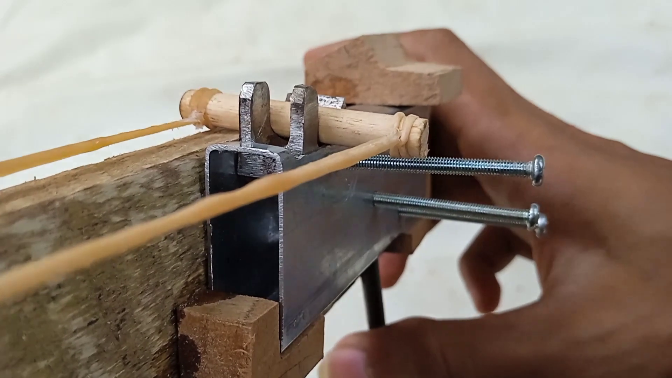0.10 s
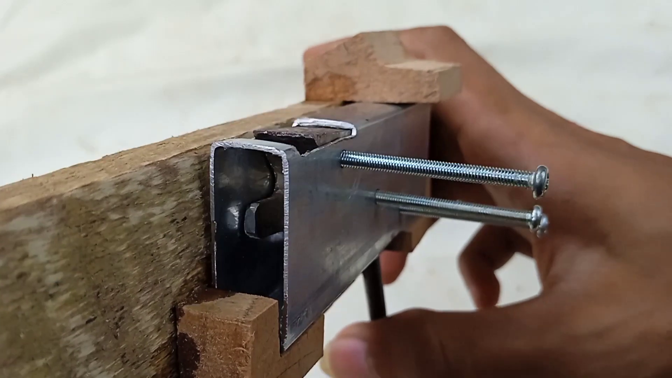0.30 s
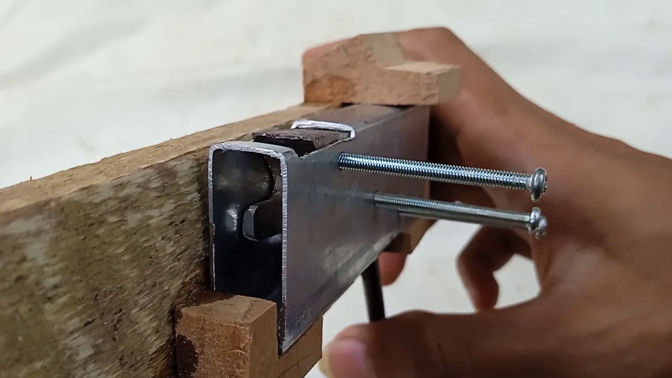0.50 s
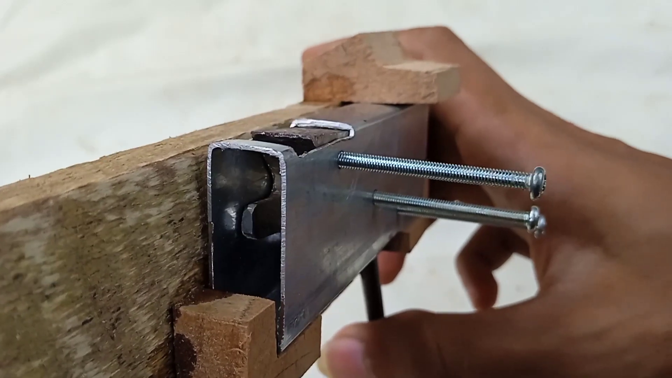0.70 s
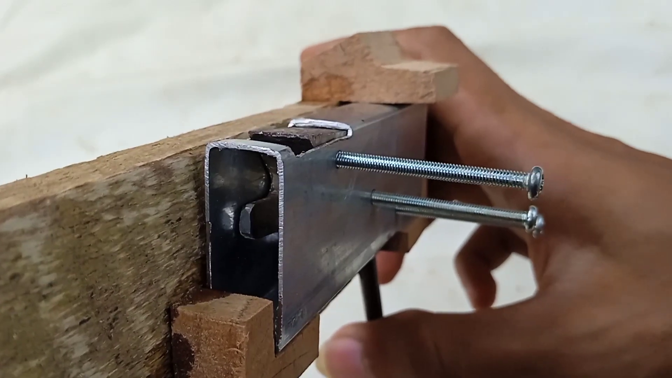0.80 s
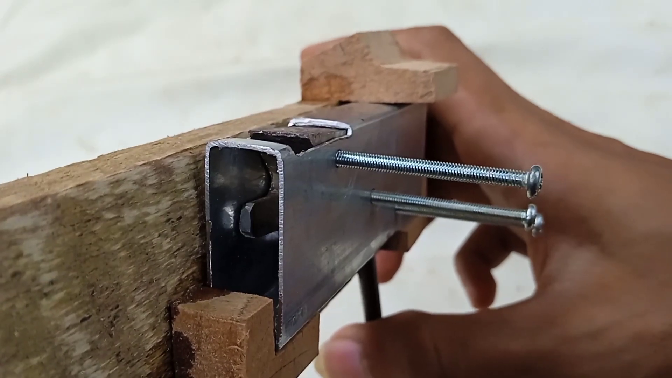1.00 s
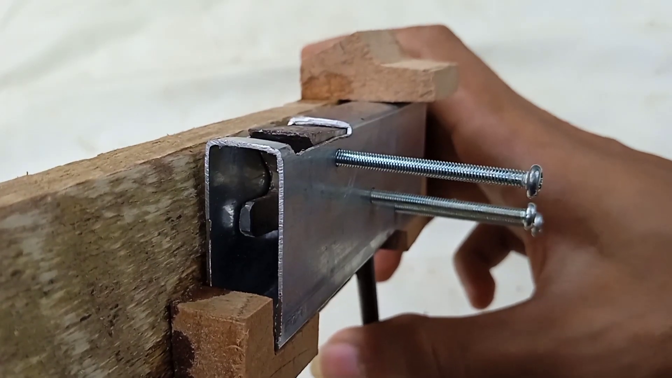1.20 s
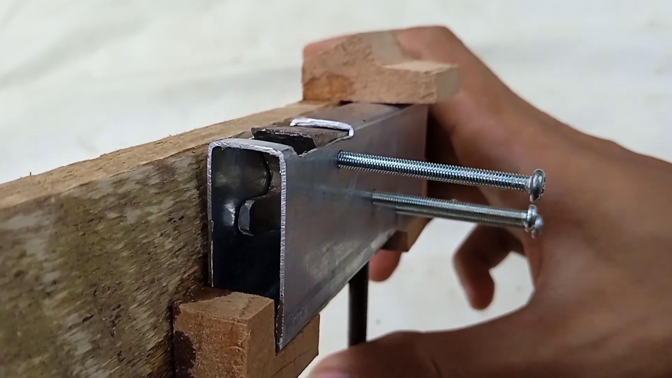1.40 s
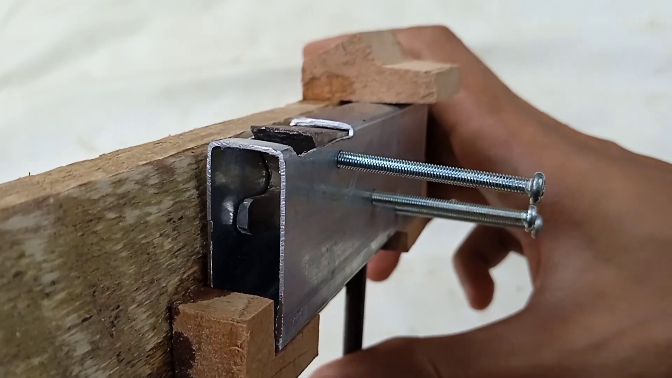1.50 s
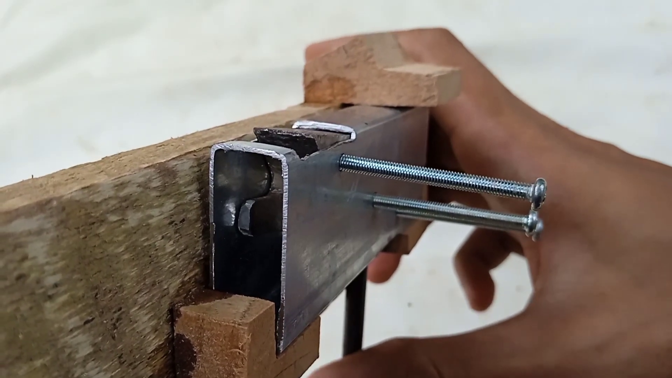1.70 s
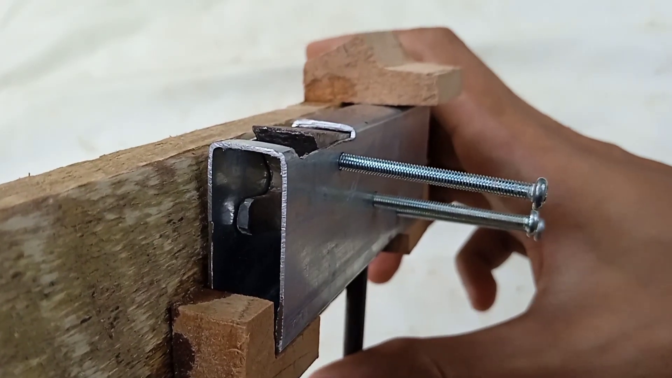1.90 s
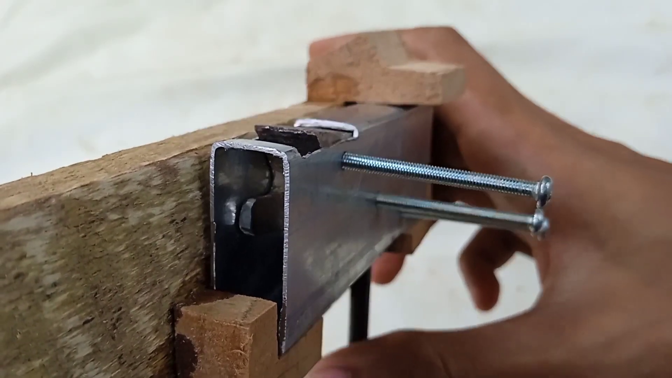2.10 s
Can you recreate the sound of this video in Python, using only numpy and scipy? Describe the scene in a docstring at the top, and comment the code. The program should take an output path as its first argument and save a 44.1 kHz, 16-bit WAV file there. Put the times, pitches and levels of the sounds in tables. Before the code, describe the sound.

A steel catch clatters in its metal tube and a rubber band slaps the wooden stock almost at once, a hard bright snap. Much quieter ticks follow, close-miked in a small room over faint background noise.

```python
"""A faint low rumble, hiss and thin, high whine lead to a rubber-band crossbow fired close by in a small room.
The steel catch flips and rattles in its metal tube, and the freed band slaps the wooden stock and rebounds.
Afterwards a finger works the loose trigger, with faint clicks and scrapes.
Blows are decaying modes plus contact noise with a diffuse room tail; the background is filtered noise."""
import sys
import numpy as np
from scipy import signal
from scipy.fft import rfft, irfft
from scipy.io import wavfile

SR = 44100
rng = np.random.default_rng(int(sys.argv[2]) if len(sys.argv) > 2 else 0)


def store_wav(level_fs):
    """Save 16-bit WAV to argv[1]."""
    pcm = np.round(np.clip(np.atleast_2d(level_fs), -1, 1) * 32767)
    wavfile.write(sys.argv[1], SR, pcm.T.astype(np.int16))


N = 97020

# modes of the steel catch and tube: (frequency [Hz], relative level [dB], t60 [s])
STEEL_MODES = [(1825, -17, 0.024), (2192, -1, 0.024), (2416, -5, 0.014), (2470, -9.5, 0.032),
               (2586, -14.5, 0.037), (2720, -16, 0.063), (2822, -18.5, .07), (3180, -17.5, 0.038),
               (4207, -16, 0.026), (5770, -18.5, .035), (6740, -20, 0.032), (15167, -21, .016)]


def amp(db):
    """Level law: decibels to an amplitude ratio."""
    return 10 ** (np.asarray(db) / 20)


def unit(x):
    """Power normalisation: scale to rms 1."""
    return x / np.sqrt(np.mean(x ** 2) + 1e-20)


def along(points, hz):
    """Logarithmic pitch: interpolate (frequency, value) points on a log-frequency axis."""
    f, v = np.transpose(points)
    return np.interp(np.log(hz + 1), np.log(f + 1), v)


def curve(rows):
    """Linear interpolation: (time, value) rows as one value per sample."""
    return np.interp(np.arange(N) / SR, *np.transpose(rows))


def noise(gain, size):
    """Spectral shaping: white noise weighted by gain over frequency, at rms 1."""
    spectrum = rfft(rng.standard_normal(size))
    hz = np.fft.rfftfreq(size, 1 / SR)
    return unit(irfft(spectrum * gain(hz), size))


def fade(t, t60):
    """Exponential damping: the level falls by 60 dB in t60 seconds."""
    return np.exp(-np.log(1000) * t / t60)


def onset(t, rise_s):
    """Exponential build-up with time constant rise_s."""
    return 1 - np.exp(-t / rise_s)


def add(out, s, x):
    """Superposition: mix x into out from time s, cut at the end of out."""
    part = out[round(s * SR):][:len(x)]
    part += x[:len(part)]


def ring(modes):
    """Modal vibration: damped sinusoids whose levels differ a little at each blow."""
    scatter_db = 1  # standard deviation
    t = np.arange(SR // 8) / SR
    tones = np.zeros(len(t))
    for hz, db, t60 in modes:
        level = amp(db + scatter_db * rng.standard_normal())
        tones += level * fade(t, t60) * np.sin(2 * np.pi * hz * t)
    return tones * onset(t, rise_s=0.0005)


def crack(spectrum, t60, colour=np.zeros_like):
    """Broadband contact excitation: dense, quickly dying noise with an optional extra colour in dB."""
    t = np.arange(SR // 8) / SR
    burst = noise(lambda hz: amp(along(spectrum, hz) + colour(hz)), size=len(t))
    return burst * fade(t, t60) * onset(t, rise_s=0.0005)


def catch():
    """Impact excitation of modes: the released catch whirls round and clatters against the tube."""
    # the catch strikes its housing: (time [s], ring level [dB], crack level [dB])
    strikes = [(0.2033, -30, -39), (0.2064, -25, -25.5), (0.2090, -15.5, -20), (0.213, -13, -25),
               (0.2166, -28, -35), (0.2206, -31.5, -29.5), (0.2568, -35.5, -52.5), (0.2668, -43.5, -47.5),
               (0.2895, -54, -60)]
    # steel contact noise: (frequency [Hz], relative spectral level [dB])
    steel_crack = [(100, -38.5), (400, -16), (950, -9.5), (1300, -12), (2300, 3), (3100, -6), (6300, 1.5),
                   (7500, -10.5), (10000, -10.5), (12000, -21), (13800, -18.5), (15300, -2.5)]
    out = np.zeros(N)
    for s, ring_db, crack_db in strikes:
        metal = amp(ring_db) * ring(STEEL_MODES)
        contact = amp(crack_db) * crack(steel_crack, t60=0.027)
        add(out, s, in_room(metal + contact))
    return out


def band():
    """Impact on damped wood: the rubber band slaps the stock and rebounds."""
    # the band meets the stock: (time [s], knock level [dB], crack level [dB])
    slaps = [(0.2226, -19, -15.5), (0.2259, -14, -22.5), (0.228, -31, -33), (0.256, -48, -48.5),
             (0.2650, -46.5, -45)]
    # modes of the wooden stock: (frequency [Hz], relative level [dB], t60 [s])
    stock_modes = [(490, -22, 0.033), (896, -14.5, .03), (1230, -19.5, 0.03), (1590, -2.5, 0.01),
                   (1746, -3, 0.021), (2023, -0.5, 0.015), (2200, -2, 0.028), (2640, -8, 0.021),
                   (3450, -11, .018), (4172, -11, .02), (4264, -7.5, 0.018)]
    # slap contact noise: (frequency [Hz], relative spectral level [dB])
    slap_crack = [(100, -34), (350, -17), (900, -5.5), (1200, 1.5), (2000, 9), (3100, 0.5), (4300, 2.5),
                  (5000, -6), (7000, -4), (10000, -8), (13300, -20.5), (15300, -11)]
    out = np.zeros(N)
    for s, knock_db, crack_db in slaps:
        knock = amp(knock_db) * ring(stock_modes)
        contact = amp(crack_db) * crack(slap_crack, t60=0.021)
        add(out, s, in_room(knock + contact))
    return out


def trigger():
    """Light impact and friction: ticks of the steel parts, coloured by contact, with gritty rubbing."""
    # the loose trigger ticks:
    # (time [s], ring level [dB], crack level [dB], brightest frequency [Hz], fall above it [dB per octave])
    ticks = [(0.3931, -62, -59.5, 2300, 3), (0.4035, -57, -59, 2780, 10), (0.764, -80, -60.5, 500, 5.5),
             (1.02, -54, -56.5, 2580, 31), (1.126, -75, -67.5, 2770, 13), (1.379, -69, -64, 2500, 3),
             (1.3922, -59, -55.5, 3830, 8.5), (1.4445, -64, -63, 2480, 12), (1.476, -67, -56.5, 1900, 1),
             (1.4785, -47.5, -57.5, 2120, 6.5), (1.4991, -62, -56, 1700, 4), (1.509, -65, -71, 1980, 4.5),
             (1.549, -69, -66.5, 2214, 20), (1.581, -62, -64, 2290, 13), (1.5928, -60.5, -60, 2880, 11),
             (1.597, -61, -58.5, 990, 4), (1.6256, -62.5, -57, 2830, 11.5), (2.181, -68, -65.5, 2150, 3.5),
             (2.193, -64, -73, 3000, 2)]
    # tick contact noise before its colour: (frequency [Hz], relative spectral level [dB])
    tick_crack = [(100, -37), (500, 5.5), (1200, -6.5), (2400, 0.5), (3400, -4), (4500, -5.5), (6700, -3.5),
                  (8000, -12.5), (13000, -18), (15300, -8.5)]
    # the trigger rubs: (time [s], length [s], level [dB])
    scrapes = [(1.373, 0.029, -73.5), (1.421, 0.052, -75), (1.465, 0.042, -68), (1.537, 0.031, -80.5),
               (1.576, .03, -71), (2.159, 0.062, -80.5)]
    # rubbing noise: (frequency [Hz], relative spectral level [dB])
    rub_spectrum = [(200, -12), (1200, -1.5), (2300, 3), (3300, -0.5), (4500, -17), (7000, -24),
                    (12000, -27), (15300, -18)]
    bass_fall_share = 0.44  # below its brightest frequency a tick falls off less steeply
    out = np.zeros(N)
    for s, ring_db, crack_db, bright_hz, fall_db in ticks:
        def colour(hz):
            """Contact filter: gain in dB falling to either side of the brightest frequency."""
            octaves = np.log2((hz + 1) / bright_hz)
            return fall_db * np.minimum(bass_fall_share * octaves, -octaves)

        modes = [(hz, db + colour(hz), t60) for hz, db, t60 in STEEL_MODES]
        add(out, s, amp(ring_db) * ring(modes))
        add(out, s, amp(crack_db) * crack(tick_crack, 0.019, colour))
    for s, length, db in scrapes:
        size = int(length * SR)
        # grit: a random level, spread 4 dB, held for 64 samples at a time
        grit = np.repeat(amp(4 * rng.standard_normal(N // 64)), 64)[:size]
        rub = noise(lambda hz: amp(along(rub_spectrum, hz)), size=N)[:size]
        add(out, s, amp(db) * unit(grit * rub) * signal.windows.tukey(size, .5))
    return in_room(out)[:N]


def in_room(x):
    """Diffuse reverberation: a close sound followed by a short tail with decay set by frequency."""
    # reverberation: (frequency [Hz], t60 [s])
    room_decay = [(200, .25), (800, .22), (1700, .29), (5000, 0.26), (9000, .285), (12500, 0.16),
                  (15200, 0.25)]
    # colour of the tail: (frequency [Hz], relative level [dB])
    room_colour = [(200, 4.5), (500, 6.5), (850, 3.5), (1150, -3), (2200, -3.5), (4500, -1.5), (9000, 2),
                   (12500, 3.5), (15200, 1), (16300, -7)]
    tail_db, build_s = -18, 0.0076  # tail energy against the direct sound; build-up time constant
    hz, t, z = signal.stft(rng.standard_normal(SR // 2), SR, nperseg=256)
    decay = fade(t, along(room_decay, hz)[:, None])
    shape = decay * amp(along(room_colour, hz))[:, None] * onset(t, build_s)
    tail = signal.istft(z * shape, SR, nperseg=256)[1]
    answer = amp(tail_db) * tail / np.linalg.norm(tail)
    answer[0] += 1  # direct sound
    return signal.fftconvolve(x, answer)


def hiss_swells():
    """Band-limited noise under an envelope: high hiss comes up quickly and ebbs away."""
    # swells of the high hiss: (time [s], noise level before the envelope [dB])
    swells = [(0.0, -92), (0.429, -89), (0.841, -90.5), (1.68, -91.5), (2.071, -90.5)]
    centre_hz, half_width_hz = 7700, 1000
    out, t = np.zeros(N), np.arange(SR // 2) / SR
    envelope = fade(t, t60=0.89) * onset(t, rise_s=0.0086)
    for s, db in swells:
        hiss = noise(lambda hz: 1 / (1 + np.abs((hz - centre_hz) / half_width_hz) ** 10), size=len(t))
        add(out, s, amp(db) * hiss * envelope)
    return out


def background():
    """Filtered random noise: a slowly varying rumble, steady hiss and a narrow, fluttering whine."""
    # rumble and hiss together: (frequency [Hz], relative spectral level [dB])
    floor_spectrum = [(20, -35.5), (40, -24), (60, -12.5), (115, -1), (170, -5), (260, -13.5), (500, -23),
                      (1000, -29), (2000, -34.5), (4500, -42), (8200, -45), (9300, -49.5), (14000, -50),
                      (15300, -43.5)]
    # gain of the rumble: (time [s], level [dB])
    rumble_levels = [(0, -62.5), (.38, -63), (.5, -72), (.55, -73), (.585, -56), (.62, -66.5), (.85, -66),
                     (1.3, -73), (1.39, -68.5), (1.5, -75.5), (1.65, -68.5), (1.75, -73.5), (1.93, -74),
                     (2.1, -63), (2.2, -72)]
    # whine: (time [s], level [dB])
    whine_levels = [(0, -80.5), (.35, -81.5), (.6, -78.5), (.95, -77.5), (1.25, -83.5), (1.5, -80.5),
                    (2.2, -86.5)]
    hiss_db, hiss_from_hz = -68, 180  # the floor above this edge stays steady
    whine_hz, whine_half_width_hz = 5398.5, 68
    floor = noise(lambda hz: amp(along(floor_spectrum, hz)), size=N)
    low_pass = 1 / (1 + (np.fft.rfftfreq(N, 1 / SR) / hiss_from_hz) ** 4)
    low = irfft(rfft(floor) * low_pass, N)
    rumble = amp(curve(rumble_levels)) * low
    hiss = amp(hiss_db) * (floor - low)
    whine = noise(lambda hz: 1 / (1 + np.abs((hz - whine_hz) / whine_half_width_hz) ** 3), size=N)
    return rumble + hiss + amp(curve(whine_levels)) * whine


def scene():
    """Radiation and superposition: the crossbow, thinned in the bass, over its background."""
    # small parts radiate little bass
    thin = signal.butter(2, 430, "high", fs=SR, output="sos")
    crossbow = signal.sosfilt(thin, catch() + band() + trigger())
    return (crossbow + background() + hiss_swells())[None]


def record(dry):
    """Band limitation: the recorder suppresses what lies above its upper limit."""
    top_hz = 16550  # 70 dB down from here up
    return signal.sosfilt(signal.cheby2(18, 70, top_hz, fs=SR, output="sos"), dry)


dry = scene()
out = record(dry)
store_wav(out)
```